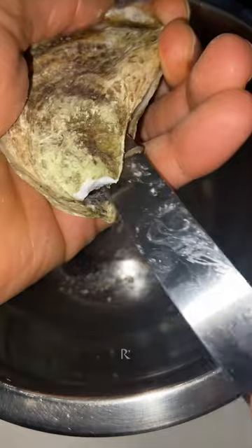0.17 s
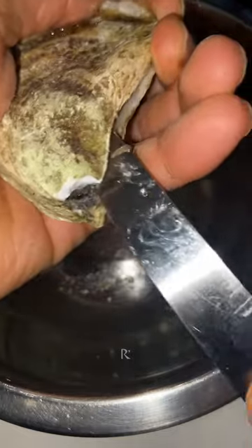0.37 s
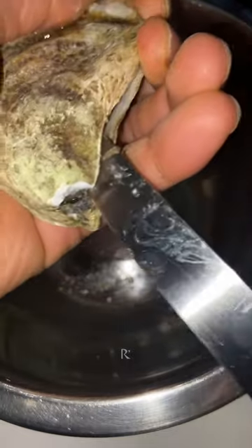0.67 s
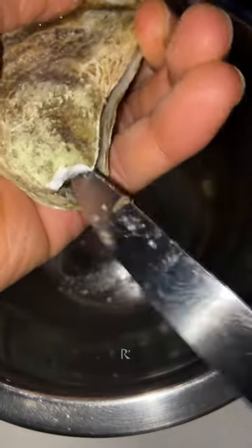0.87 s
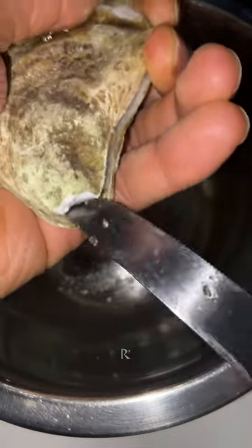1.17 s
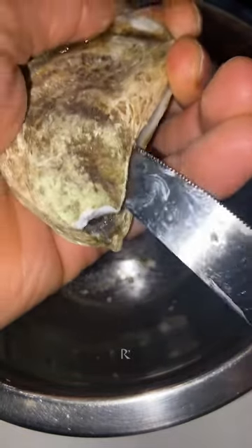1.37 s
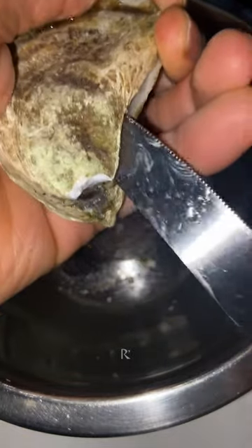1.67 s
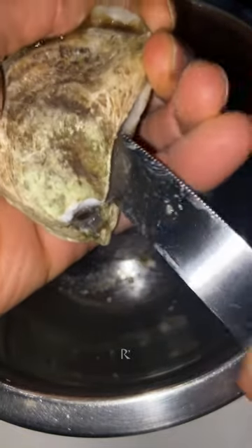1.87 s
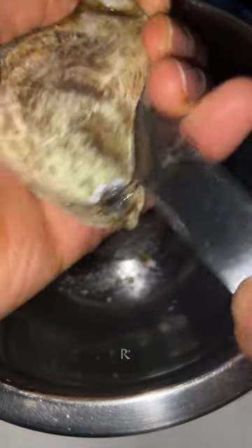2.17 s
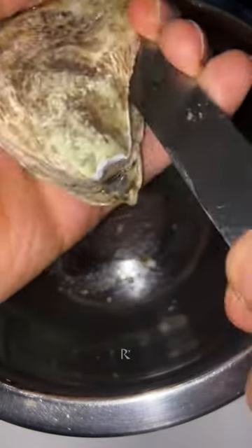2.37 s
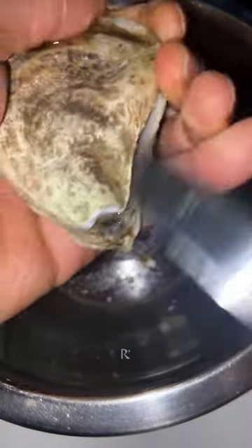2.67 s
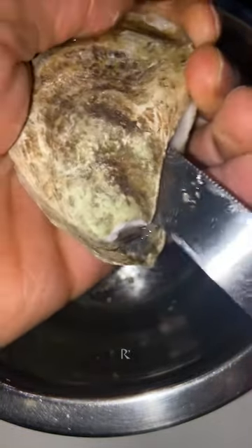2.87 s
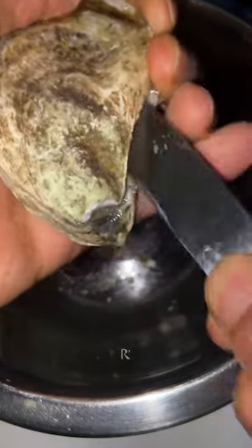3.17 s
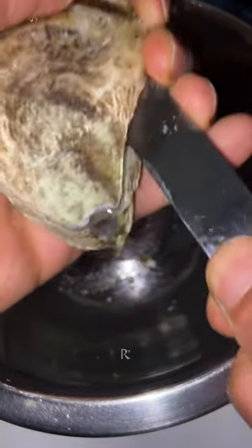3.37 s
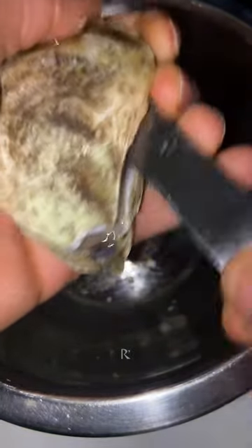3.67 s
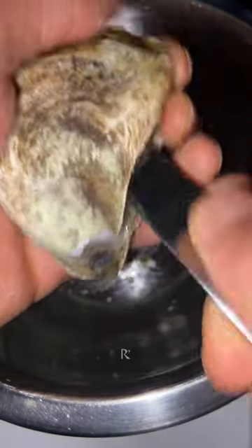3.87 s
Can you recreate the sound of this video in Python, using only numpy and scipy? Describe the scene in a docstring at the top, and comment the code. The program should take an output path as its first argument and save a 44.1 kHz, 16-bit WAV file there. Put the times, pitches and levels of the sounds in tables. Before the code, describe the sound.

A knife blade scrapes against an oyster shell, close up. Light, gritty rasps start around 0.5 seconds, with a sharp crunch just after 1 second. Short scrapes follow, then a quick run of clicks near 2 seconds as the blade sticks and slips. Irregular scraping and cracking continue, with the sharpest chips snapping between 3.2 and 3.9 seconds. A faint low room rumble lies underneath.

```python
"""Shucking an oyster

A steel table knife works into the seam of an oyster held in one hand over a metal bowl. The blade rasps
along the rim, sticks and slips, crushes flakes and snaps chips off; brine squelches and the hand damps
the shell's ring. A close two-port microphone hears it in a small room with a low rumble."""
import sys
import numpy as np
from scipy import signal
from scipy.fft import rfft, irfft
from scipy.io import wavfile

SR = 44100
rng = np.random.default_rng(int(sys.argv[2]) if len(sys.argv) > 2 else 0)


def output_pcm(signal):
    """Save a mono or channel-first signal as 16-bit PCM at the path in sys.argv[1].

    Samples are clipped to [-1, 1] before scaling.
    """
    pcm = np.clip(np.atleast_2d(signal).T, -1, 1) * 32767
    wavfile.write(sys.argv[1], SR, np.round(pcm).astype(np.int16))


N = 176400

# Colour of the room's rumble and of its hiss: f/Hz, relative level/dB
RUMBLE_SPECTRUM = [(18, -27.5), (47, -2), (92, 1.5), (120, 0), (158, -20), (209, -7), (253, -16.5),
                   (296, -10), (380, -22.5)]
HISS_SPECTRUM = [(650, -1), (900, -8.5), (1450, -9.5), (1900, -21), (15000, -44)]
# Slow swell of the rumble: t/s, gain/dB
RUMBLE_SWELL = [(0, -1), (3, 1.1), (4, -4)]

# Shell and blade ringing together: f/Hz, gain/dB, t60/s
SHELL_MODES = [(1240, -14, .02), (1950, 1, .026), (2070, -4, .018), (2390, 0, .018), (2920, -7, .013),
               (3550, -5, .011), (4050, -7, .008), (4680, -8, .011), (5600, -5, .008), (9200, 10, .004)]
# The hollow of the seam changes pitch as the blade shifts in it: t/s, f/Hz
SEAM_PITCH = [(.89, 3550), (1.08, 3090), (1.8, 3600), (3.05, 3750), (3.27, 4700), (3.319, 3810),
              (3.42, 4900), (3.63, 4430), (3.985, 5100)]
# Edges of the four bands that voice a contact, low to high (thud, ring, crack, fizz): f/Hz
BAND_EDGES = (250, 1730, 2800, 6200, 16500)
# Band gains for rubbing and rasping: thud/dB, ring/dB, crack/dB, fizz/dB
FRICTION_COLOUR = (-11, -3.5, -2, 3.5)
# Band gains for ticks and slips, relative to the ring: thud/dB, crack/dB, fizz/dB
TICK_COLOUR = (-7.5, -3, 7.5)
SLIP_COLOUR = (-17, -4, -6.5)

# Pressure of the resting blade: t/s, level/dB
RUB_PRESSURE = [(0.198, -84), (2.198, -69)]
# The tip touches the rim: t/s, ring level/dB
TIP_TICKS = [(0.259, -74.5), (0.324, -74), (0.7337, -68.5), (2.878, -53.5), (3.027, -49.5), (3.114, -51),
             (3.223, -51.5)]
# Strokes along the rim: start/s, end/s, start pressure/dB, end pressure/dB, fizz gain/dB
RASP_STROKES = [(0.343, 0.413, -74.5, -71, 4), (0.536, 0.658, -54, -70, 0),
                (0.727, 0.818, -58.5, -75, -7.5), (0.888, 0.925, -36, -53.5, -7.5),
                (0.936, 0.972, -71, -52, -10.5), (0.997, 1.063, -43.5, -46, -14.5),
                (1.081, 1.181, -51, -57.5, -6.5), (1.34, 1.358, -67, -45.5, -8.5),
                (1.497, 1.58, -50, -59.5, -7.5), (1.642, 1.73, -57.5, -41, -5),
                (1.799, 1.866, -54.5, -38.5, -4.5), (1.923, 2.015, -49.5, -36, -8.5),
                (1.984, 2.123, -41.5, -39.5, -12), (2.233, 2.288, -49, -43.5, -4),
                (2.292, 2.385, -62, -50, -1.5), (2.466, 2.472, -44, -31.5, -7.5),
                (2.6, 2.656, -40.5, -49.5, -4), (2.72, 2.798, -53, -45, -5.5), (2.881, 2.9, -59, -36.5, -6),
                (2.918, 3.045, -50, -52, -8), (3.211, 3.292, -50.5, -42, -6.5),
                (3.376, 3.449, -38.5, -37.5, -8.5), (3.629, 3.765, -39.5, -60, -6.5),
                (3.765, 3.875, -63.5, -59, -3), (3.874, 3.98, -65.5, -43.5, 0.5)]
# Wet pockets in the seam: t/s, f/Hz, peak level/dB
BRINE_POCKETS = [(.567, 738, -41.5), (3.698, 2170, -45), (3.706, 880, -49), (3.779, 1270, -54)]
# Flakes and chips breaking: t/s, ring level/dB before trim, then relative thud/dB, crack/dB, fizz/dB
FLAKE_CRUNCHES = [(0.5695, -51, 8.5, 8.5, -23), (0.8905, -34.5, 8, -23, -10), (1.073, -27.5, -7.5, 5, -17),
                  (1.0822, -21, -9.5, 2.5, -3.5), (2.1312, -26.5, -12.5, -5, -5.5),
                  (2.4735, -39.5, -13.5, 7, -17), (2.6203, -33, -6, 6.5, 8.5),
                  (2.8945, -39.5, -3.5, 6.5, 2.5), (3.0403, -30, -11, -10, -3),
                  (3.074, -39.5, -7, -8, -3.5), (3.3245, -37, 3.5, 6, -7), (3.3908, -18, -16, -12.5, -9),
                  (3.4362, -31.5, -8, -17, -16), (3.4488, -22.5, -10.5, -5.5, 1),
                  (3.9848, -34, -0.5, 3.5, 0.5)]
CHIP_SNAPS = [(0.6097, -31, -5, -6.5, -14), (1.0172, -34, 0.5, 1, -31), (1.9908, -22, -16, -2.5, -6),
              (2.5346, -31, -6.5, 4.5, -1.5), (3.2704, -24, -25, -3.5, -9), (3.319, -22, -12, 8, -4),
              (3.6186, -19.5, -17, 1.5, -3.5), (3.6517, -21, -9.5, 2.5, 5), (3.8615, -31, 1, 13.5, 9)]
# The stuck blade lets go: t/s, ring level/dB before trim
BLADE_SLIPS = [(0.6607, -54.5), (0.8965, -37.5), (0.9126, -38.5), (1.14, -47), (1.9423, -36), (1.985, -30),
               (2.0008, -34), (2.011, -28), (2.0208, -30), (2.0322, -33.5), (2.0465, -30.5), (2.054, -31.5),
               (2.0713, -39), (2.0799, -29.5), (2.0919, -29.5), (2.11, -41), (2.2383, -41.5),
               (2.281, -29.5), (2.3052, -39), (2.3471, -36.5), (2.384, -39), (2.515, -45), (2.6441, -29.5),
               (3.156, -53)]

# Phase between the microphone ports: f/Hz, lead of the left/rad
PORT_LEAD = [(2100, 0), (3150, 1.7), (3500, .2), (4300, .8), (5200, .1), (6460, 2.4), (8270, 3.8),
             (9820, 6.1), (11200, 6.5), (12700, 9), (16000, 12.4)]
# Balance between the ports: f/Hz, left minus right/dB
PORT_TILT = [(2000, -1), (2750, -9), (3400, 1.5), (4200, -4.5), (5200, 1.1)]


def from_db(db):
    """Decibels to gain."""
    return 10 ** (np.asarray(db) / 20)


def unit_rms(x):
    """Scale to rms 1."""
    return x / np.sqrt(np.mean(x ** 2) + 1e-30)


def at_hz(points, hz):
    """Read a curve on a log-frequency axis."""
    freqs, values = np.transpose(points)
    return np.interp(np.log(np.maximum(hz, 1)), np.log(freqs), values)


def at_time(points, t):
    """Read a curve on a time axis."""
    return np.interp(t, *np.transpose(points))


def cut(x, hz, kind, order=2):
    """Butterworth filter."""
    return signal.sosfilt(signal.butter(order, hz, kind, fs=SR, output="sos"), x + 1e-18)


def noise(spectrum):
    """Steady noise of a given colour, rms 1."""
    colour = from_db(at_hz(spectrum, np.fft.rfftfreq(N, 1 / SR)))
    return unit_rms(irfft(rfft(rng.standard_normal(N)) * colour, N))


def room_tone():
    """A bed of low, centred rumble under faint, wide hiss."""
    swell = from_db(-43.5 + at_time(RUMBLE_SWELL, np.arange(N) / SR))
    rumble = swell * unit_rms(cut(noise(RUMBLE_SPECTRUM), 376, "low", order=6))
    hiss_mid = noise(HISS_SPECTRUM)
    hiss_side = from_db(-2.5) * noise(HISS_SPECTRUM) * np.array([[1], [-1]])
    return rumble + from_db(-62.5) * (hiss_mid + hiss_side)


def grains(size, per_s, spread_db):
    """Tiny fractures at random moments, mostly small and a few large."""
    strength = from_db(spread_db * np.minimum(rng.exponential(1, size), 4))
    return (rng.random(size) < per_s / SR) * strength * rng.choice([-1, 1], size)


def resonate(force, hz, t60_s):
    """One damped resonance, rung by a force."""
    radius, angle = from_db(-60 / (t60_s * SR)), 2 * np.pi * hz / SR
    feedback = radius * np.cos(angle)
    return signal.lfilter([1, -feedback], [1, -2 * feedback, radius ** 2], force + 1e-18)


def shell(force, when_s, direct_db, bands_db, length_s):
    """A force rings seam and shell; each of the four bands is set to its rms level over length_s."""
    grip_detune = 1 + 0.02 * rng.standard_normal()
    _, ring_db, crack_db, _ = bands_db
    choke_db = 3 * max(crack_db - ring_db - 3, 0)  # a hard-pressed blade chokes the lowest modes
    seam = resonate(force, at_time(SEAM_PITCH, when_s), t60_s=0.0072)
    body = from_db(direct_db) * force + from_db(15.5) * seam
    for hz, db, t60_s in SHELL_MODES:
        scatter_db = 4.5 * rng.standard_normal()  # each contact rings differently
        gain = from_db(db - choke_db * (hz < 2200) + scatter_db)
        body += gain * resonate(force, hz * grip_detune, t60_s)
    palm_lag = int(0.00073 * SR * rng.uniform(.5, 1))  # reflection off the hand
    body += 0.42 * np.pad(body, (palm_lag, 0))[:len(body)]
    body = cut(body, 10000, "low")
    body = cut(body, 467, "high", order=1)
    out = 0
    for low, high, db in zip(BAND_EDGES, BAND_EDGES[1:], bands_db):
        band = cut(body, [low, high], "band", order=5)
        out += from_db(db) * band * np.sqrt(length_s * SR / np.sum(band ** 2))
    return out


def friction(pressure, grit, when_s, fizz_db):
    """Grit under the blade excites the shell; loudness follows the pressure."""
    bands_db = np.array(FRICTION_COLOUR) + [0, 0, 0, fizz_db]
    length_s = np.sum(pressure ** 2) / SR
    return shell(pressure * grit, when_s, direct_db=35, bands_db=bands_db, length_s=length_s)


def rub():
    """The blade rests in the seam: a faint, continuous rub of ticking crumbs."""
    pressure = from_db(at_time(RUB_PRESSURE, np.arange(N) / SR))
    crumbs = grains(N, per_s=4500, spread_db=2)
    return friction(pressure, crumbs, when_s=0, fizz_db=-6.5)


def breaks(rows, decay_s, debris_db, rise_s=1 / SR):
    """Each break is one sharp release inside a brief cloud of smaller fractures."""
    lead_s, tail_s = .015, .06
    out = np.zeros(N)
    t = np.arange(-int(lead_s * SR), int(tail_s * SR)) / SR
    cloud = from_db(debris_db) * np.exp(np.minimum(t / rise_s, -t / decay_s))
    for when_s, ring_db, thud_db, crack_db, fizz_db in rows:
        force = (t == 0) + cloud * grains(len(t), per_s=7600, spread_db=2)
        bands_db = ring_db + np.array([thud_db, 0, crack_db, fizz_db])
        add(out, when_s - lead_s, shell(force, when_s, direct_db=31, bands_db=bands_db, length_s=.01))
    return out


def add(out, start_s, sound):
    """Mix a sound in on its cue."""
    i = int(start_s * SR)
    out[i:i + len(sound)] += sound[:max(N - i, 0)]


def ticks():
    """The tip taps the rim: light, bright clicks."""
    rows = [(when_s, db, *TICK_COLOUR) for when_s, db in TIP_TICKS]
    return breaks(rows, decay_s=.0012, debris_db=-7)


def teeth(per_s, jitter, bite_db):
    """One second of serrations ticking over the rim, nearly evenly; each tooth bites differently."""
    gaps_s = (1 + jitter * rng.uniform(-1, 1, int(2 * per_s))) / per_s
    bites = from_db(bite_db) * rng.rayleigh(.5, len(gaps_s))
    onsets = (np.cumsum(gaps_s) * SR).astype(int)
    return np.bincount(onsets, bites, minlength=SR)[:SR]


def rasp():
    """Each stroke drags grit and teeth over the shell while the pressure rises or falls."""
    attack_s, release_s, margin_s = 0.0046, 0.0063, .06
    catches_per_s, catch_db = 115.3, 2  # the edge catches unevenly on the ridges
    out = np.zeros(N)
    for start, end, start_db, end_db, fizz_db in RASP_STROKES:
        t = np.arange(start - margin_s, end + margin_s, 1 / SR)
        fade = np.exp(np.minimum((t - start) / attack_s, (end - t) / release_s).clip(max=0))
        pressure = fade * from_db(np.interp(t, [start, end], [start_db, end_db]))
        ridges = rng.standard_normal(SR // 100)
        catch = from_db(catch_db * np.interp((t - t[0]) * catches_per_s, np.arange(len(ridges)), ridges))
        grit = grains(SR, per_s=4700, spread_db=2.5) + teeth(per_s=105, jitter=.45, bite_db=19)
        add(out, t[0], friction(pressure, catch * grit[:len(t)], (start + end) / 2, fizz_db))
    return out


def squelches():
    """Small pockets of brine ring briefly as the seam gives."""
    rise_s = 0.005
    out, t = np.zeros(N), np.arange(SR // 10) / SR
    envelope = t / rise_s * np.exp(1 - t / rise_s)
    for when_s, hz, db in BRINE_POCKETS:
        add(out, when_s, from_db(db) * envelope * np.sin(2 * np.pi * hz * t))
    return out


def crunches(trim_db):
    """Flakes crush under the blade, swelling to a break."""
    return from_db(trim_db) * breaks(FLAKE_CRUNCHES, rise_s=0.0038, decay_s=0.0043, debris_db=-10)


def snaps(trim_db):
    """Chips snap off: an instant crack with a short spray of debris."""
    return from_db(trim_db) * breaks(CHIP_SNAPS, decay_s=0.0026, debris_db=-9)


def slips(trim_db):
    """The blade sticks, then lets go with a tight, ringing click."""
    rows = [(when_s, db, *SLIP_COLOUR) for when_s, db in BLADE_SLIPS]
    return from_db(trim_db) * breaks(rows, decay_s=.0012, debris_db=-7)


def mic_ports(x):
    """Close sound reaches the two ports with a different phase and strength."""
    spectrum, hz = rfft(x, 2 * N), np.fft.rfftfreq(2 * N, 1 / SR)
    half_db = at_hz(PORT_TILT, hz) / 2
    left = spectrum * from_db(half_db)
    right = spectrum * from_db(-half_db) * np.exp(-1j * at_hz(PORT_LEAD, hz))
    return irfft([left, right])[:, :N]


def reverb(x):
    """A short, dull tail from bowl and walls, different on each side."""
    t60_s, predelay_s, damping_hz, wet_db = 0.12, 0.0049, 5800, -22.5
    t = np.arange(SR // 2) / SR
    tail = cut(rng.standard_normal((2, len(t))), damping_hz, "low", order=1)
    tail *= from_db(-60 * t / t60_s) * (t > predelay_s)
    tail /= np.sqrt(np.sum(tail ** 2, axis=1, keepdims=True))
    return from_db(wet_db) * signal.fftconvolve(x[None], tail, axes=1)[:, :N]


def scene():
    """Knife on shell up close, with a touch of reverb, over the room tone."""
    transients = snaps(trim_db=-4.5) + crunches(trim_db=-2) + slips(trim_db=-3.5) + ticks()
    knife = transients + rasp() + rub() + squelches()
    return mic_ports(knife) + reverb(knife) + room_tone()


def record(dry):
    """A steep low-pass takes off the very top."""
    cutoff_hz = 16200
    return signal.sosfilt(signal.ellip(10, .2, 80, cutoff_hz, fs=SR, output="sos"), dry)


dry = scene()
out = record(dry)
output_pcm(out)
```